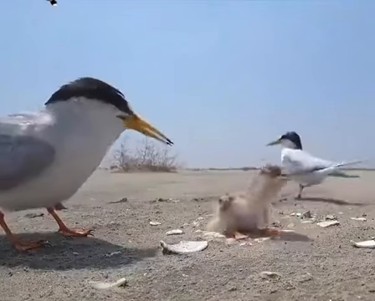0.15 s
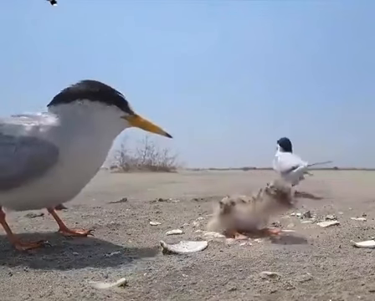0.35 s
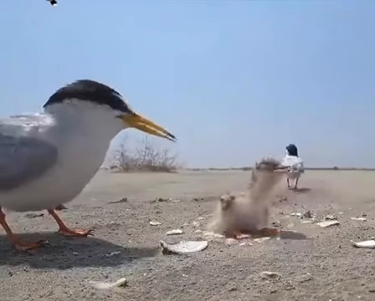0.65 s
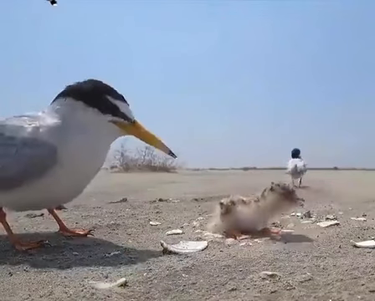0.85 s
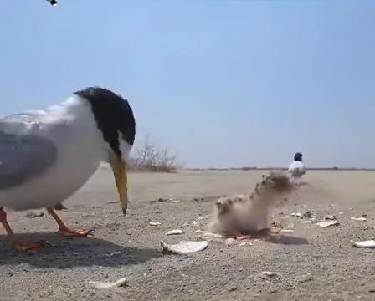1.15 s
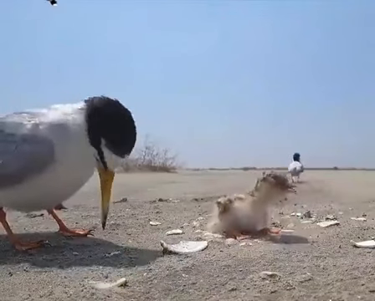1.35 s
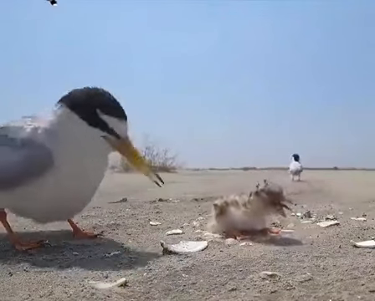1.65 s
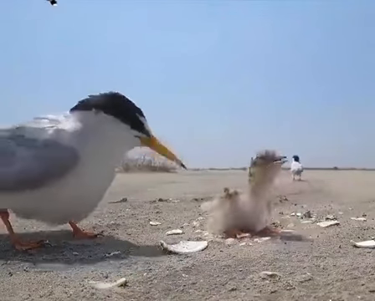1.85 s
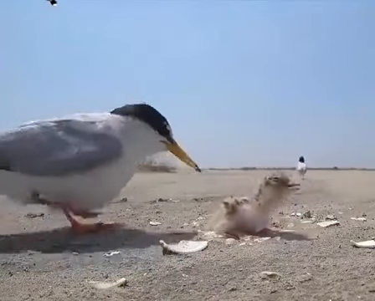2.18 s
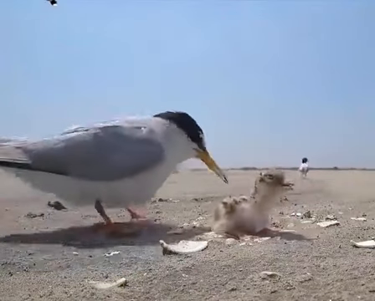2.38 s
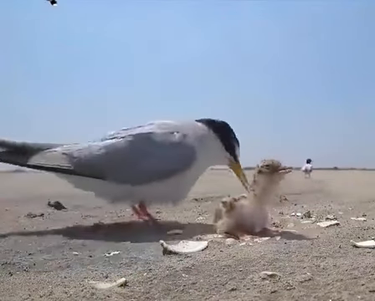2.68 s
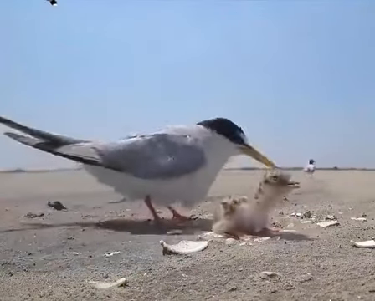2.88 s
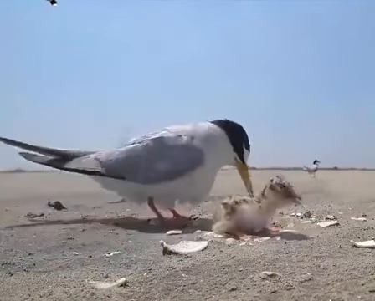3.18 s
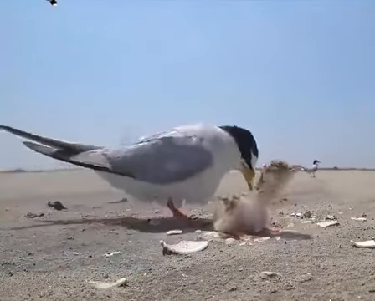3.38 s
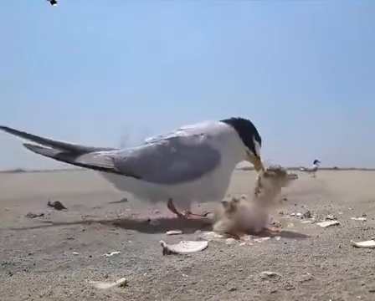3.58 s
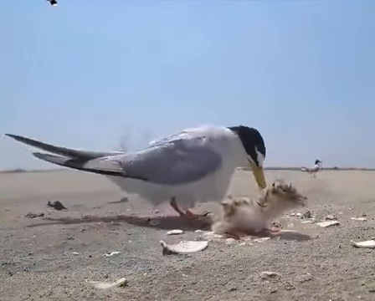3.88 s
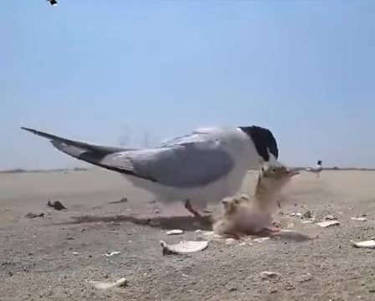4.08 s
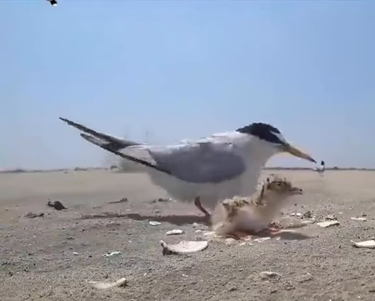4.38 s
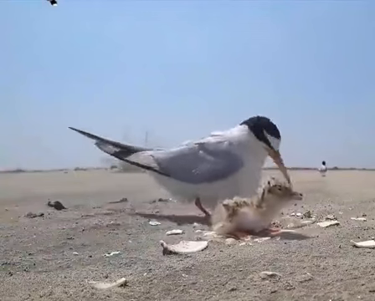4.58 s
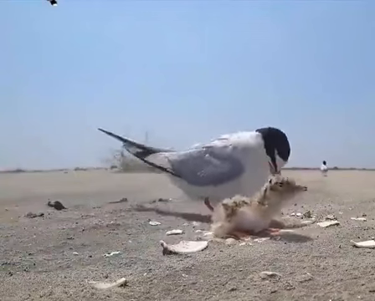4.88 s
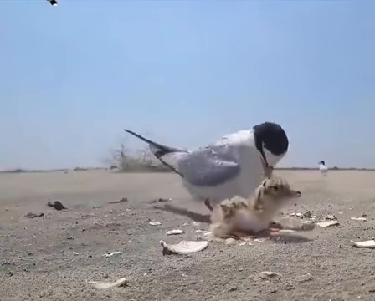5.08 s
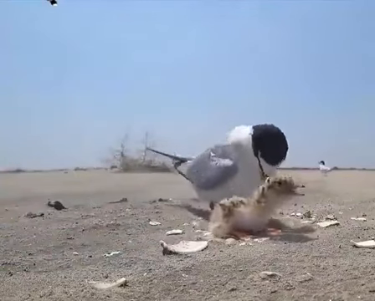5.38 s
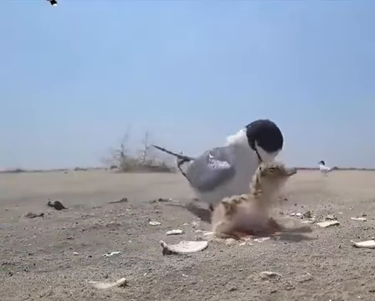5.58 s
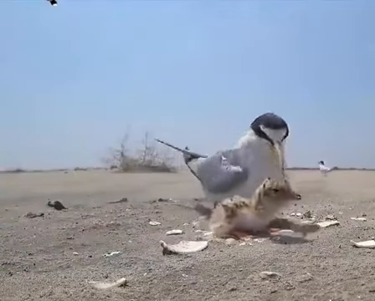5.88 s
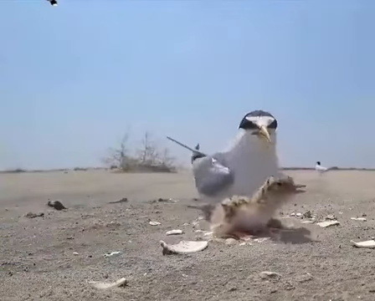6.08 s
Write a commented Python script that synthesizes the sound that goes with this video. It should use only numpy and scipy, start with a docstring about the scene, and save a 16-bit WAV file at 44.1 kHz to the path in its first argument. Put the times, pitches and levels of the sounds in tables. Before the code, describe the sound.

Loud sharp tern calls and low stuttering rasps very close on an open beach, with faint distant bird peeps over soft wind and surf.

```python
"""Terns at a nest scrape on an open beach, close to a small camera on the sand.
A loud clear 'keek', harmonics under a bill resonance, opens over a noise wash of wind and surf.
Gliding far peeps and faint hoarse sounds join in the first half second, with tiny chirps at random moments.
After a second come low stuttering rasps, pulse trains that ring a throat, and a squeal that breaks in
register; two soft croaks follow past the middle, and a last squeal and 'keek' come near the end."""
import sys
import numpy as np
from scipy import signal
from scipy.fft import rfft, irfft, next_fast_len
from scipy.io import wavfile
from scipy.ndimage import uniform_filter1d, minimum_filter1d, map_coordinates

SR = 44100
rng = np.random.default_rng(int(sys.argv[2]) if len(sys.argv) > 2 else 0)


def to_wav(sig):
    """Store sig (one row per channel, or 1-D mono) as 16-bit WAV at the path in sys.argv[1].

    Samples outside -1..1 are clipped; the rate is SR.
    """
    pcm = np.clip(np.atleast_2d(sig), -1, 1) * 32767
    pcm = np.round(pcm).astype(np.int16)
    wavfile.write(sys.argv[1], SR, pcm.T)  # frames by channels


N = 275184  # length in samples
TOP_HZ = 13200  # upper band limit


def amp(db):
    """Decibel law: 20 dB is a tenfold amplitude."""
    return 10 ** (np.asarray(db) / 20)


def unit(x):
    """Normalisation to an rms of 1."""
    return x / np.sqrt(np.mean(x ** 2) + 1e-20)


def along(points, hz):
    """Interpolation of (Hz, value) points on a logarithmic frequency axis."""
    f, v = np.transpose(points)
    return np.interp(np.log(hz + 1), np.log(f + 1), v)


def wobble(rate, size):
    """Band-limited random modulation: a smooth curve through `rate` random knots a second."""
    knots = rng.standard_normal(int(size * rate / SR) + 4)
    return map_coordinates(knots, [np.arange(size) * rate / SR])


def filtered(x, response):
    """Linear filtering: the spectrum of x times a response of frequency."""
    m = next_fast_len(N + 8192)
    return irfft(rfft(x, m) * response(np.fft.rfftfreq(m, 1 / SR)), m)[..., :N]


def turbulence(spectrum):
    """Turbulent flow as Gaussian noise shaped by (Hz, dB) points, at rms 1."""
    return unit(filtered(rng.standard_normal(N), lambda hz: amp(along(spectrum, hz))))


def add(track, s, sound):
    """Superposition: mixes a sound into the track at s seconds."""
    at = round(s * SR)
    sound = sound[max(0, -at):]
    part = track[max(0, at):][:len(sound)]
    part += sound[:len(part)]


def ramp(t, length):
    """Linear transition from 0 to 1 between t = 0 and t = length."""
    return np.clip(t / length, 0, 1)


def bump(t, width):
    """Gaussian hump of height 1 around t = 0."""
    return np.exp(-(t / width) ** 2)


def edges(size, fade_s=0.002):
    """Fades at both ends, which avoid the click of an abrupt start or stop."""
    t = np.arange(size) / SR
    return ramp(np.minimum(t, t[::-1]), fade_s)


# Clear calls. Each row: start in seconds, length in seconds, time constant of the opening glide in seconds,
# held pitch in Hz, pitch dip before the break as a share, final yelp in seconds, yelp pitch in Hz,
# level in dB, bill resonance on the held pitch in Hz, bill gape as treble tilt in dB at 10 kHz.
KEEK_CALLS = [(-0.025, 0.13356, .014, 1295, 0, .026, 1488, -8, 4328, 2.5),
              (.574, 0.13713, 0.00723, 1291, .085, .024, 2020, -10, 4310, -0.5),
              (1.811, 0.1311, 0.0099, 1404, 0, .027, 2096, -9, 4656, 5.5),
              (5.876, .113, 0.02032, 1322, .01, .030, 1930, -10, 4000, -5)]


def keek(row, slack_hz=550, end_hz=950, attack_glides=1.05, release_s=0.017, break_s=0.011,
         push=0.04, push_lead_s=.02, dip_lead_s=.01, attack_db=-23, break_db=-5, yelp_db=-2.5,
         release_db=-15, bill_sag=0.36, bill_follow=0.3, yelp_harmonic=2.15):
    """Register break: pitch glides up, holds, pushes, dips, jumps to a yelp and collapses; the bill closes."""
    s, length, glide_s, held_hz, dip, yelp_s, yelp_hz, db, bill_hz, gape_db = row
    t = np.arange(int(length * SR)) / SR
    since = t - (length - yelp_s)  # time from the register break
    yelp = ramp(since + break_s / 2, break_s)
    release = ramp(t - length + release_s, release_s) ** 2

    held = held_hz + (slack_hz - held_hz) * np.exp(-t / glide_s)
    push_curve = push * bump(since + push_lead_s, push_lead_s / 2)
    dip_curve = dip * bump(since + dip_lead_s, dip_lead_s / 2)
    held = held * (1 + push_curve - dip_curve)
    pitch = held + yelp * (yelp_hz - held)
    pitch = pitch + release * (end_hz - pitch)

    level = db + attack_db * (1 - ramp(t, attack_glides * glide_s)) ** 2 + release_db * release
    level = level + break_db * bump(since + break_s / 2, break_s) + yelp_db * yelp

    closing = 1 - bill_sag * ramp(t, length - yelp_s) ** 4
    bill = bill_hz * (held / held_hz) ** bill_follow * closing
    # during the yelp the resonance moves toward a multiple of the yelp pitch
    bill = bill + yelp * (1 - release) * (yelp_harmonic * yelp_hz - bill)
    return s, pitch, level, bill, gape_db


# Harmonics that leak past the bill resonance. Each row: frequency in Hz, relative level in dB.
LEAKED_OVERTONES = [(600, -20.5), (1300, -4), (3800, -3), (6000, -3.5), (7100, -11.5), (8300, -16),
                    (9200, -25.5), (13000, -40)]
# Turbulence in the calls. Each row: frequency in Hz, relative density in dB per Hz.
CALL_HISS = [(300, -30), (900, -9.5), (2000, -9), (3800, -1), (6000, -7.5), (7000, -28.5), (8400, -25.5),
             (9200, -33), (13000, -42)]


def clear_calls(calls, below_db, above_db, floor_db, jitter, strain, hiss_db, crack_db, fray=0):
    """Source and filter: harmonics under a moving bill resonance, its flanks in dB per kHz."""
    voice, air = np.zeros(N), np.zeros(N)
    k = np.arange(1, 13)[:, None]  # harmonic numbers
    for start, pitch, db, bill, gape_db in calls:
        n = len(pitch)
        # the syrinx is steady on a held note, rough while its pitch sweeps, and can fray toward the end
        sweep = uniform_filter1d(np.abs(np.gradient(np.log(pitch))) * SR, size=300)
        unsteady = np.clip(sweep / 45 + fray * np.linspace(0, 1, n) ** 6, 0, 1)
        pitch = pitch * (1 + (jitter + strain * unsteady) * wobble(1100, n))

        harmonic_hz = k * pitch
        offset_khz = (harmonic_hz - bill) / 1000
        resonance = amp(np.minimum(below_db * offset_khz, -above_db * offset_khz))
        leak = amp(floor_db + along(LEAKED_OVERTONES, harmonic_hz))
        gains = (resonance + leak) * (harmonic_hz < TOP_HZ)
        gains = gains * amp(gape_db * np.minimum(harmonic_hz / 10 ** 4, 1))
        gains /= np.linalg.norm(gains, axis=0)
        # each harmonic flutters on its own, the weak ones and those of a sweep most
        flutter_db = .7 + 2.5 * unsteady + 1.5 * (gains < .15)
        gains = gains * amp(flutter_db * np.array([wobble(380, n) for _ in k]))

        level = amp(db) * edges(n)
        phase = 2 * np.pi * np.cumsum(pitch) / SR
        # the resonance delays each harmonic as it passes through
        waves = np.cos(k * phase - np.arctan(2 * offset_khz))
        add(voice, start, level * np.sqrt(2) * np.sum(gains * waves, axis=0))
        add(air, start, level * (amp(hiss_db) + amp(crack_db) * unsteady))
    return voice + air * turbulence(CALL_HISS)


# Hiss that surrounds and trails a near call. Each row: frequency in Hz, relative density in dB per Hz.
TRAIL_HISS = [(400, -22), (900, -11), (1600, -6.5), (2600, 3.5), (3700, -1.5), (5000, 2), (6100, -0.5),
              (7000, -9.5), (8400, -9.5), (9200, -30.5), (13000, -32)]


def trail(x, level_db=-21, t60=0.096):
    """Exponential decay: a hoarse hiss follows the power of every near call and dies just after it."""
    keep = amp(-120 / (t60 * SR))  # power falls by 60 dB in t60 seconds
    power = np.abs(signal.lfilter([1 - keep], [1, -keep], x ** 2))
    return amp(level_db) * np.sqrt(power) * turbulence(TRAIL_HISS)


# Echo off the ground. Each row: frequency in Hz, 60 dB decay time in seconds before stretching.
GROUND_DECAY = [(500, .06), (1200, .075), (3500, .125), (10000, .115)]


def ground(x, width, stretch):
    """Diffuse reflection: a short decaying noise echo off sand and shells; width is its side share."""
    hz, t, z = signal.stft(rng.standard_normal((2, SR // 3)), SR, nperseg=128)
    decay = amp(-60 * t / (stretch * along(GROUND_DECAY, hz)[:, None]))
    tail = signal.istft(z * decay, SR, nperseg=128)[1]
    tail = tail * (1 - np.exp(-np.arange(tail.shape[1]) / SR / .002))  # soft onset
    mid, side = signal.fftconvolve(x[None], tail / np.linalg.norm(tail[0]), axes=1)[:, :N]
    return np.array([mid + width * side, mid - width * side])


# Colour of the wash. Each row: frequency in Hz, relative density in dB per Hz.
WASH_COLOUR = [(25, -12), (55, -6), (150, 0.5), (330, 2.5), (600, -1.5), (1000, -3), (1800, -9),
               (2600, -4.5), (4200, -7.5), (5500, -11), (8000, -16), (10000, -18.5), (13000, -22.5)]
# Slow course of the wash. Each row: time in seconds, level in dB before the trim and the waver.
WASH_LEVEL = [(0, -58), (2.3, -58), (2.9, -55), (5.8, -54), (6.03, -57)]
# Likeness of the two channels of the wash. Each row: frequency in Hz, left-right correlation from 0 to 1.
WASH_LIKENESS = [(60, 1), (150, 0.86), (300, 0.751), (1500, 0.36), (4000, .6), (10000, 0.17)]


def shore(trim_db=-2, patchy_db=1.0, drone_hz=151, drone_db=-75):
    """Partial coherence: a wide, patchy noise wash of wind and surf with a faint wavering drone."""
    z = signal.stft(rng.standard_normal((2, N)), nperseg=512)[2]
    patches = uniform_filter1d(rng.standard_normal(z.shape[1:]), size=6, axis=0)
    patches = uniform_filter1d(patches, size=16, axis=1)
    pair = signal.istft(z * amp(patchy_db * unit(patches)), nperseg=512)[1][:, :N]

    def mid_side_response(hz):
        """Correlation as an angle: it divides the wash between mid and side."""
        angle = np.arccos(np.clip(along(WASH_LIKENESS, hz), -1, 1)) / 2
        return amp(along(WASH_COLOUR, hz)) * [np.cos(angle), np.sin(angle)]

    mid, side = filtered(pair, mid_side_response)
    db = np.interp(np.arange(N) / SR, *np.transpose(WASH_LEVEL)) + trim_db + 0.97 * wobble(11.0, N)
    drone_phase = 2 * np.pi * np.cumsum(drone_hz + 4 * wobble(27, N)) / SR
    drone = np.sin(drone_phase) * amp(3.5 * wobble(4.4, N))
    return amp(db) * unit(np.array([mid + side, mid - side])) + amp(drone_db) * unit(drone)


def chatter(count=26, floor_db=-70, centre_hz=3500, mean_s=0.05, arch=.08):
    """Frequency modulation: many terns far down the beach give tiny arched chirps at random moments."""
    out = np.zeros(N)
    for when, tone, size, slope in rng.random((count, 4)):
        u = np.linspace(-1, 1, int(mean_s * (.5 + size) * SR))
        glide = 1 - arch * u ** 2 + 2 * arch * (slope - .5) * u
        pitch = centre_hz * 2 ** (0.61 * (tone - .5)) * glide
        chirp = (1 - u ** 2) * np.sin(2 * np.pi * np.cumsum(pitch) / SR)
        add(out, when * N / SR, amp(floor_db + 8 * size) * chirp)  # longer chirps are louder
    return out


# Thin peeps farther off. Each row: start in seconds, first glide in seconds, second glide in seconds,
# start pitch in Hz, middle pitch in Hz, end pitch in Hz, level in dB.
FAR_PEEPS = [(.290, 0.0165, .025, 3584, 3540, 3511, -58.5), (.392, 0.019, 0.075, 4110, 4228, 2620, -46.5),
             (1.583, 0.0206, 0.0177, 3090, 3620, 3690, -53),
             (2.720, 0.0157, 0.0303, 3393, 3350, 3105, -52.5),
             (3.115, 0.0512, 0.0595, 3830, 4438, 5400, -43), (3.220, 0.0264, 0.0228, 4800, 4275, 3500, -45),
             (3.610, 0.04, 0.0735, 4240, 4220, 4333, -56.5), (4.378, .062, 0.028, 3450, 4605, 5400, -43),
             (4.468, 0.0187, 0.024, 5366, 4490, 3100, -42), (4.594, 0.0195, .010, 3540, 3850, 3900, -49),
             (4.785, 0.0185, 0.0212, 3220, 3350, 3420, -55.5),
             (5.066, .015, 0.0212, 3760, 3780, 3700, -55.5), (5.500, .013, 0.017, 3477, 3700, 3650, -55)]


def peeps(jitter=0.0072, edge_db=-11, skew=.65, flutter_db=1.2):
    """Frequency glide: nearly pure whistles that swell quickly and fade."""
    out = np.zeros(N)
    for s, first_s, second_s, start_hz, middle_hz, end_hz, db in FAR_PEEPS:
        n = int((first_s + second_s) * SR)
        knots_s = [0, first_s, first_s + second_s]
        pitch = np.interp(np.arange(n) / SR, knots_s, [start_hz, middle_hz, end_hz])
        phase = 2 * np.pi * np.cumsum(pitch * (1 + jitter * wobble(490, n))) / SR
        edge = (2 * np.linspace(0, 1, n) ** skew - 1) ** 2
        level = amp(db + edge_db * edge + flutter_db * wobble(150, n))
        add(out, s, np.sqrt(2) * edges(n) * level * np.sin(phase))
    return out


# Faint hoarse sounds: blurred calls, and brief ticks as some peeps begin. Each row: start in seconds,
# length in seconds, mean pitch in Hz, level in dB before the swell.
HOARSE_SOUNDS = [(0.339, 0.0227, 1127, -53), (1.737, 0.118, 2051, -48.5), (2.545, 0.1326, 1136, -50),
                 (2.97, 0.102, 1384, -55.5), (3.102, 0.0161, 1242, -47.5), (4.37, 0.0171, 1112, -51),
                 (5.22, 0.136, 1423, -53.5)]


def hoarse_sounds(rise=.16, jitter=.06):
    """Spectral smearing: a shaky rising pitch blurs the harmonics of faint calls and brief ticks."""
    out, k = np.zeros(N), np.arange(1, 7)[:, None]
    for s, length, hz, db in HOARSE_SOUNDS:
        n = int(length * SR)
        pitch = hz * (1 + rise * np.linspace(-.5, .5, n) + jitter * wobble(1000, n))
        phase = 2 * np.pi * np.cumsum(pitch) / SR
        tone = np.sum(amp(1.8 * along(CALL_HISS, k * hz)) * np.sin(k * phase), axis=0)
        add(out, s, amp(db) * unit(tone) * np.sin(np.linspace(0, np.pi, n)))
    return out


# Rasps. Each row: start in seconds, opening groan in seconds, stutter in seconds, closing note in seconds,
# crest pitch in Hz, level in dB, sounding share of a stutter from 0 to 1,
# bill gape as treble tilt in dB at 10 kHz.
RASP_CALLS = [(.932, 0.003, .028, 0, 889.3, -30, .42, -7), (1.010, 0, 0.00592, .028, 1208, -23.5, .5, -1.5),
              (1.218, .018, .042, 0.042, 1048, -18, .38, -2),
              (2.175, 0.015, .051, .038, 1070, -22.5, .36, 2),
              (2.802, .020, .069, 0.03, 1048, -24.5, .45, -1.5),
              (3.443, .027, .047, .038, 830, -20.3, .9, 7.5), (3.965, .032, .045, .041, 950, -19, .95, 8.5),
              (4.613, 0, 0, .009, 1093, -27.5, .5, -6.5), (4.650, 0, 0, .004, 1259, -24.5, .5, -3),
              (4.673, 0.0029, .011, .036, 1179, -20, .3, 0.5),
              (4.912, .018, 0.00306, .006, 930.9, -21.5, .75, -1.5),
              (4.954, 0, .008, .020, 1086, -20.5, .7, 0), (4.985, 0, 0, .012, 883.8, -28, 0.4, -1),
              (5.323, .023, .033, .050, 915, -17, .93, 5), (5.596, .021, .020, .025, 893, -22, .66, -6)]
STUTTER_S = .0108  # nominal period of the stutter
GROAN_HZ = 695.6  # crest pitch of every groan


def bursts(groan_db=-10, stutter_db=-4, spread=.045, spread_db=1.2):
    """Intermittent oscillation: groan, stutters, longer note; the more broken, the weaker the lead-in."""
    rows = []
    for s, groan_s, stutter_s, note_s, hz, db, share, gape_db in RASP_CALLS:
        slack = 1 - np.clip(share, .1, 1)  # silent share of a stutter
        if groan_s > STUTTER_S:
            rows.append((s, groan_s - slack * STUTTER_S, GROAN_HZ, db + slack * groan_db, gape_db))
        count = round(stutter_s / STUTTER_S)
        for k, (tone, size) in enumerate(rng.standard_normal((count, 2))):
            start = s + groan_s + k * stutter_s / count
            level = db + slack * stutter_db + spread_db * size
            rows.append((start, (1 - slack) * STUTTER_S, hz * (1 + spread * tone), level, gape_db))
        if note_s > 0:
            rows.append((s + groan_s + stutter_s, note_s, hz, db, gape_db))
    return rows


def ringing(spectrum, size=2048):
    """Minimum phase: the causal impulse response of a spectrum, by folding its cepstrum."""
    cepstrum = irfft(np.log(amp(along(spectrum, np.fft.rfftfreq(size, 1 / SR)))))
    cepstrum[1:size // 2] *= 2
    cepstrum[size // 2 + 1:] = 0
    return irfft(np.exp(rfft(cepstrum)))


def windpipe(x, bounce, delay_s):
    """All-pass dispersion: reflections along a short tube spread each pulse without colouring it."""
    taps = np.r_[1, np.zeros(max(1, int(delay_s * SR))), bounce]
    return signal.lfilter(taps[::-1], taps, x)


# Throat and bill during a rasp, reshaped a little for each burst.
# Each row: frequency in Hz, gain in dB before that reshaping.
THROAT_SHAPE = [(250, -33), (450, -15.5), (700, -3), (1000, 2.5), (1550, 1), (2200, -3), (2900, 2.5),
                (3700, -3), (4500, -5.5), (5600, -8.5), (6700, -25.5), (8300, -25.5), (9200, -30.5),
                (13000, -37.5)]


def rasps(rest_hz=450, dip=0.67, sag_db=6, noise_db=-11, bounce=.45, bounce_delay_s=.00022, skew=.85,
          attack_s=.005, jitter=.034, scatter_db=1.7):
    """Pulse excitation: the syrinx stutters, each burst an arch of sharp pulses that ring the throat."""
    out = np.zeros(N)
    rows = bursts()
    starts, lengths = np.transpose(rows)[:2]
    gaps = starts[1:] - starts[:-1] - lengths[:-1]
    pause = np.r_[True, gaps > .015, True]
    for i, (s, length, top_hz, db, gape_db) in enumerate(rows):
        n = int(max(length, .002) * SR)
        u = 2 * np.linspace(0, 1, n) ** skew - 1  # -1 at the start, 0 at the crest, 1 at the end
        # a rasp starts from slack membranes and ends on them; between bursts they only half relax
        first, last = [rest_hz if pause[j] and length > .011 else dip * top_hz for j in (i, i + 1)]
        onset = np.exp(-np.arange(n) / SR / (attack_s if pause[i] else .0012))
        edge = np.where(u < 0, onset, np.abs(u) ** 1.5)
        pitch = top_hz + edge * (np.where(u < 0, first, last) - top_hz)
        pitch = pitch * (1 + jitter * wobble(700, n))
        cycles = np.cumsum(pitch) / SR
        pulse_at = np.interp(np.arange(.25, cycles[-1], 1), cycles, np.arange(n))  # in samples

        # slower pulses are also weaker
        effort = amp(-sag_db * edge) * (pitch / top_hz) ** .8
        size = effort[pulse_at.astype(int)] * amp(scatter_db * rng.standard_normal(len(pulse_at)))
        pulses = -size @ np.sinc(np.arange(n) - pulse_at[:, None])
        breath = unit(rng.standard_normal(n) * effort)
        source = unit(pulses) + amp(noise_db) * breath

        # the throat takes a slightly new shape for every burst
        shift = 1 + .04 * rng.standard_normal()
        shape = []
        for hz, gain_db in THROAT_SHAPE:
            tilt_db = gape_db * min(hz / 10 ** 4, 1)
            shape.append((hz * shift, gain_db + tilt_db + rng.normal(0, 1.6)))
        burst = windpipe(signal.fftconvolve(source, ringing(shape)), bounce, bounce_delay_s)
        add(out, s, amp(db) * burst * np.sqrt(n / np.sum(burst ** 2)))
    return out


def rasp_hiss(rasp, level_db=-24, blur_s=0.012):
    """Envelope following: a smoothed hiss follows the power of the rasps and bridges the gaps between bursts."""
    power = np.abs(uniform_filter1d(rasp ** 2, size=int(blur_s * SR) + 1))
    starts, *_, gapes = np.transpose(RASP_CALLS)
    latest = np.searchsorted(starts - blur_s, np.arange(N) / SR) - 1
    gape_db = gapes[np.maximum(latest, 0)]
    colour = [(400, -21.5), (1000, 0.0), (3000, -0.5), (5500, -4.5),
              (7000, -3.5), (8400, -7.0), (9200, -15.0), (13000, -18)]  # (Hz, dB)
    return amp(level_db + 0.92 * gape_db) * np.sqrt(power) * turbulence(colour)


# Rising squeals. Each row: start in seconds, length in seconds, final whistle in seconds, level in dB,
# bill resonance at the knee pitch in Hz, bill gape as treble tilt in dB at 10 kHz.
SQUEAL_CALLS = [(1.332, 0.1176, 0, -7, 4084, 8.5), (5.659, 0.1221, .0235, -16, 3898, -2)]


def squeal(row, slack_hz=800, knee_hz=1385, glide_s=0.025, climb_hz_per_s=4300, break_s=.0565,
           whistle_hz=2660, end_hz=950, attack_s=0.033, release_s=.017, attack_db=-19, release_db=-22,
           bill_follow=0.32):
    """Register break: pitch glides up, climbs steadily, drops a fifth and may end in a high whistle."""
    s, length, whistle_s, db, bill_hz, gape_db = row
    t = np.arange(int(length * SR)) / SR
    fifth, slip_s = 2 / 3, .002
    release = ramp(t - length + release_s, release_s) ** 1.8
    tension = slack_hz + (knee_hz - slack_hz) * ramp(t, glide_s)  # as the pitch it would give, in Hz
    tension = tension + climb_hz_per_s * np.maximum(t - glide_s, 0)
    pitch = tension * fifth ** ramp(t - break_s, slip_s)
    pitch = pitch + (whistle_hz - pitch) * ramp(t - length + whistle_s, slip_s)
    pitch = pitch + release * (end_hz - pitch)
    level = db + attack_db * (1 - ramp(t, attack_s)) + release_db * release
    return s, pitch, level, bill_hz * (tension / knee_hz) ** bill_follow, gape_db


# Soft croaks. Each row: start in seconds, length in seconds, crest pitch in Hz, crest level in dB.
SOFT_CROAKS = [(3.175, 0.04, 992.8, -28.5), (3.567, 0.051, 1025, -28.5)]


def croak(row, arch=.22, edge_db=-18, bill_hz=3134, gape_db=0):
    """Joint modulation: a short note whose pitch and level swell and sink together."""
    s, length, hz, db = row
    edge = np.linspace(-1, 1, int(length * SR)) ** 2
    return s, hz * (1 - arch * edge), db + edge_db * edge ** 0.712, bill_hz, gape_db


# The two microphone ports differ. Each row: frequency in Hz, side-to-mid ratio in dB.
PORT_DIFFERENCE = [(500, -32), (1200, -29.5), (2800, -31), (4200, -23), (5500, -15), (8000, -9),
                   (12000, -11)]


def scene():
    """Direct and reflected sound: near birds ahead and almost dry, far sounds wetter, all over the shore."""
    keeks = clear_calls(map(keek, KEEK_CALLS), below_db=6.5, above_db=13.0, floor_db=-26,
                        jitter=.003, strain=0.067, hiss_db=-31.5, crack_db=-9, fray=0.38)
    far = peeps() + hoarse_sounds() + chatter()
    rasp = rasps()
    squeals = clear_calls(map(squeal, SQUEAL_CALLS), below_db=8, above_db=13.0, floor_db=-32,
                          jitter=0.0062, strain=0.025, hiss_db=-27, crack_db=-14, fray=0.65)
    croaks = clear_calls(map(croak, SOFT_CROAKS), below_db=5.5, above_db=7.5, floor_db=-16,
                         jitter=0.038, strain=.03, hiss_db=-6, crack_db=-13.5)
    near = keeks + squeals + croaks + rasp + rasp_hiss(rasp)
    near = near + trail(near)

    # the side signal is a quarter cycle out of phase
    side = filtered(near, lambda hz: 1j * amp(along(PORT_DIFFERENCE, hz)))
    direct = np.array([near + side, near - side]) * amp([[.25], [-.25]])  # left slightly louder
    close_echo = amp(-17) * ground(near, width=.4, stretch=.7)
    # a short, dense extra echo thickens the rasps
    rasp_echo = amp(-12) * ground(rasp, width=.3, stretch=.6)
    late_echo = amp(-43) * ground(near, width=.8, stretch=1.8)
    far_echo = amp(-10.5) * ground(far, width=.8, stretch=2.1)
    return direct + close_echo + rasp_echo + late_echo + far + far_echo + shore()


def record(dry):
    """Peak limiting: the camera holds the loudest calls down and passes nothing above its band limit."""
    ceiling = .85  # of full scale
    needed = np.minimum(1, ceiling / (np.abs(dry).max(axis=0) + 1e-9))
    gain = uniform_filter1d(minimum_filter1d(needed, size=200), size=200)
    return filtered(dry * gain, lambda hz: hz < TOP_HZ)


dry = scene()
out = record(dry)
to_wav(out)
```